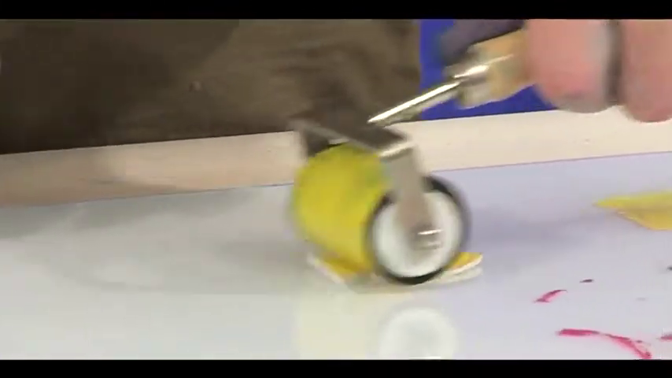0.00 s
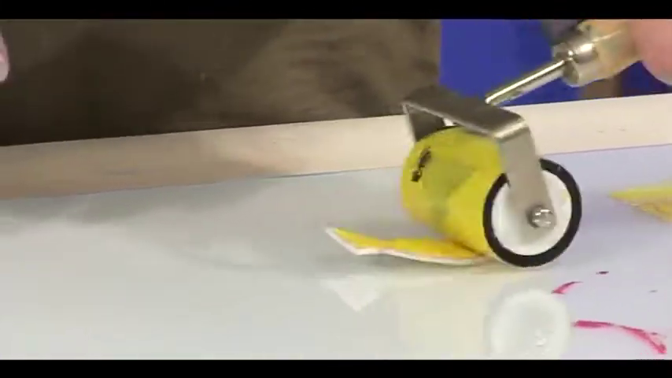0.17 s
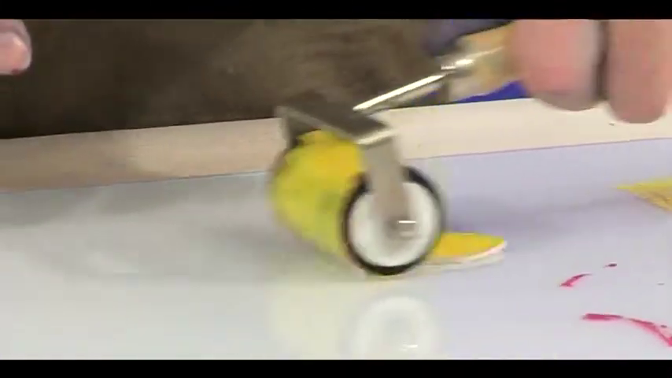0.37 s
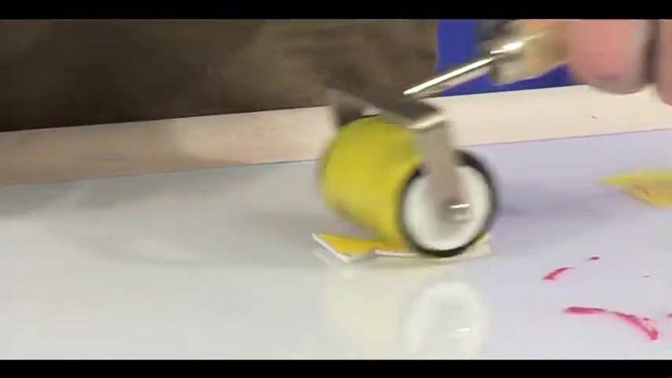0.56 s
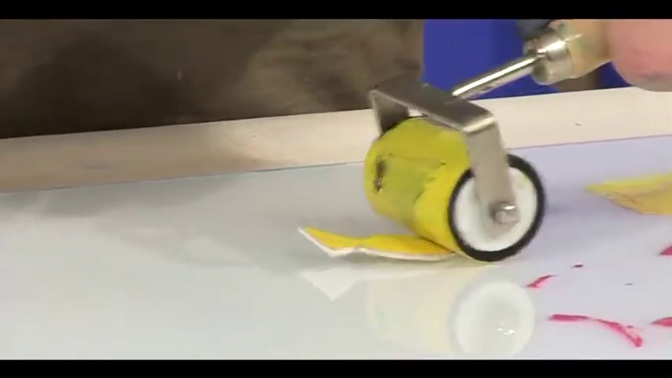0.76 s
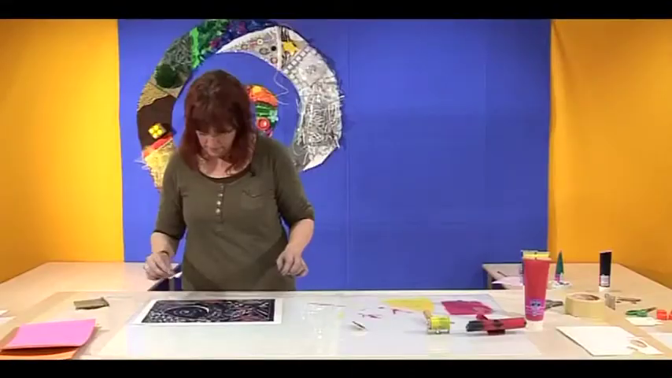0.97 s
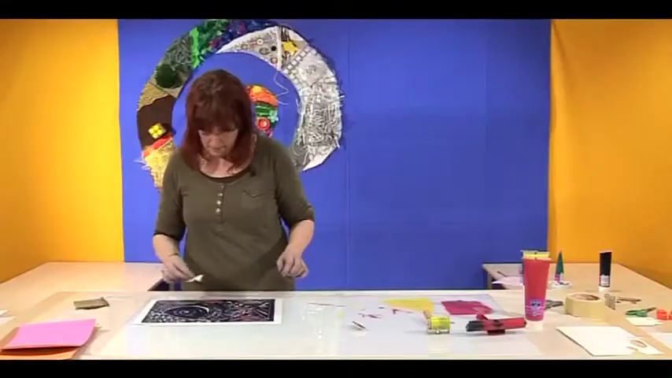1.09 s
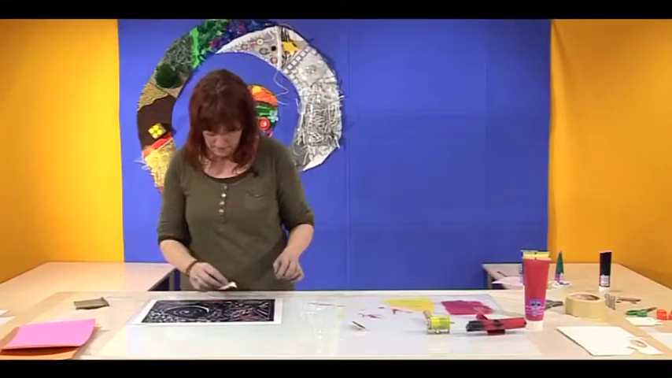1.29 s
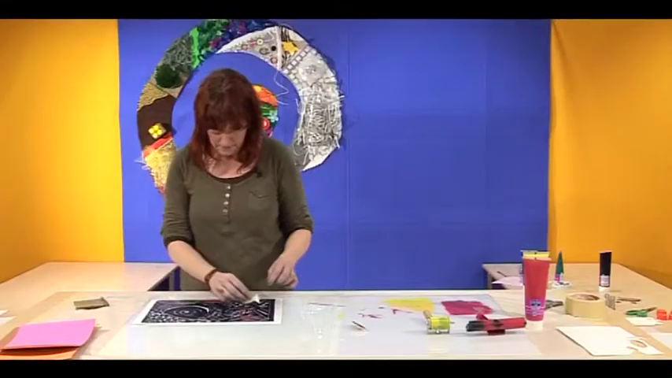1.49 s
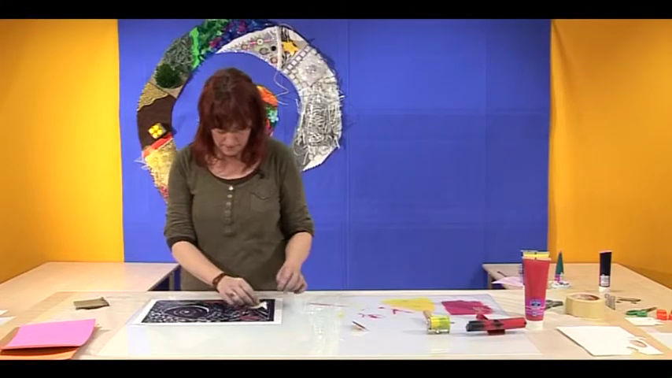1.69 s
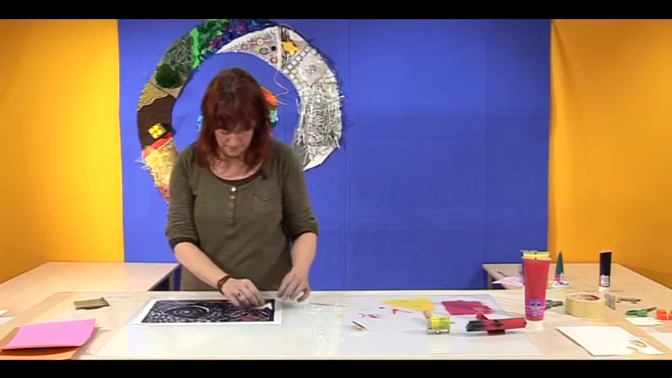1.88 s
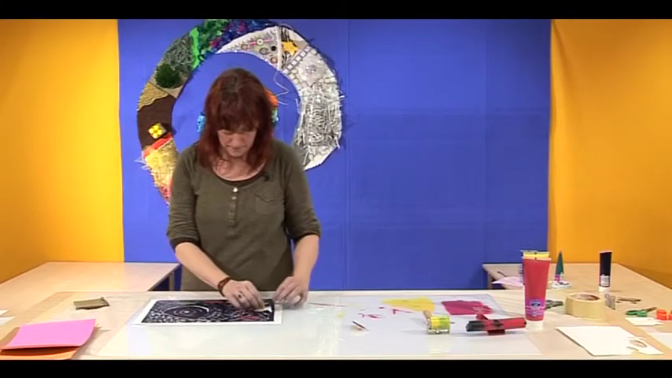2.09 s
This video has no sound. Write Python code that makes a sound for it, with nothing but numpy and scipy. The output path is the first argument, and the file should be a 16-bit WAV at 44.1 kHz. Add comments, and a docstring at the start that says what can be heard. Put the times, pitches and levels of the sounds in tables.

```python
"""A hard-walled studio: close by, a small rubber roller is pushed to and fro over a smooth sheet.
Its axle squeaks by stick-slip (stacks of harmonics), chatters (grainy noise) and rings the metal bracket.
The rubber hisses as it rolls (shaped noise), and the room holds the squeaks (decaying noise echo).
An edit cuts off roller and echo; after a brief, much quieter gap, a second shot has only the quiet room
and small handling rustles."""
import sys
import numpy as np
from scipy import signal
from scipy.fft import rfft, irfft
from scipy.io import wavfile
from scipy.ndimage import uniform_filter1d

SR = 44100
rng = np.random.default_rng(int(sys.argv[2]) if len(sys.argv) > 2 else 0)


def makeup_ratio(level_db):
    """Linear amplitude ratio for a level in decibels (20 dB per factor of ten)."""
    decades = np.asarray(level_db, float) / 20
    return 10 ** decades


def transcribe(u):
    """Save the signal u as a 16-bit wav file named by the first command-line argument.

    u: samples, shape (n,) or (channels, n), limited to [-1, 1]; the rate is SR.
    q: integer samples, one column per channel.
    """
    v = np.clip(np.atleast_2d(u).T, -1, 1)
    q = np.round(v * 32767).astype(np.int16)
    wavfile.write(sys.argv[1], SR, q)


N = 92610  # length in samples, 2.1 s
LEAD = SR // 2  # samples worked out before the start, so that earlier echoes are heard
CUT_S, GAP_S, GAP_DB = .9655, .004, -24  # when the edit cuts to the second shot; length and depth of the gap

# Squeaks of the axle, one list for each squeak. Each row: time in seconds, slip rate in Hz,
# level in dB before the harmonics are weighted, brightness in dB added to harmonic 2 (more to higher ones).
SQUEAK_PATHS = [
    [(0.2, 2190, -62, -20), (.208, 2204, -52, -37), (0.2118, 2158, -37, -14), (0.2127, 1918, -40.5, -1),
     (0.216, 1900, -37, -1.5), (0.226, 1821, -36.5, 0), (0.229, 1852, -39, -0.5), (0.235, 1834, -38.5, .5),
     (0.241, 1845, -37, 1), (.25, 1860, -35, -2), (.253, 1788, -48.5, 3), (.256, 1742, -45.5, -13),
     (.263, 1711, -45, -1), (0.27, 1980, -36, -3.5), (0.273, 1996, -51, -2), (0.28, 1944, -38.5, -24),
     (.285, 1950, -63, -10)],
    [(.07, 1948, -72, -12), (.11, 2050, -69, -7), (.15, 2060, -72, -21), (.17, 2110, -66, -18),
     (.197, 2200, -68, -18)],
    [(.694, 1920, -76, -2), (.699, 1933, -64, -14), (.702, 1943, -48.5, -19), (.709, 1900, -47, -8.5),
     (.713, 1800, -62, -14)],
    [(.722, 1980, -69, -23), (.735, 2070, -59, -23), (.75, 2140, -59, -30), (.757, 2080, -80, -20)],
    [(.76, 2124, -77, -9), (.768, 2057, -53, -35), (.77, 1850, -47, -3), (.7755, 1879, -38.5, -1.37),
     (.781, 1904, -39, -0.85), (.7858, 1845, -41, -1.5), (.7878, 1770, -50, -2), (.792, 1750, -62, -2)],
    [(.806, 1790, -74, -18), (.811, 1814, -48.5, -4), (.819, 1942, -37.5, -5), (.826, 1906, -45.5, -2),
     (.831, 1990, -39.5, -7.5), (.84, 2005, -45, -1), (.847, 1940, -58, -0.5), (.853, 1965, -69, -10),
     (.87, 1980, -64, -2), (.92, 1990, -72, -15), (.94, 1985, -67.5, -26), (.97, 1975, -69, -6)],
]
# A squeak that ends before the start, so only its echo is heard.
EARLIER_START_S, EARLIER_LENGTH_S, EARLIER_HZ, EARLIER_DB = -.15, .05, 1965, -46
# Overtones of the slipping. Each row: multiple of the slip rate, weight in dB before brightness and flutter.
HARMONIC_WEIGHTS = [(1, -1.5), (2, -1.5), (3, -8.5), (4, -14.5), (5, -26), (6, -21.5), (7, -28), (8, -24.5)]
JITTER = .008  # steady scatter of the slip rate, as a share of it
FLUTTER_DB = 2.4  # wavering of each harmonic above the first
# Moments when the slipping breaks up. Each row: start in seconds, length in seconds,
# peak level of the chatter in dB, extra scatter as a share of the slip rate.
CHATTER_MOMENTS = [(0.064, 0.11, -80, 0.031), (0.217, 0.035, -53.5, 0.0027), (0.245, 0.02, -44.5, 0.014),
                   (0.689, 0.035, -76, 0.023), (0.71, 0.057, -74, 0.015), (.768, 0.04, -74, 0.014),
                   (0.804, 0.033, -66, 0.003)]
# Tone of the chatter. Each row: centre in Hz, width of each of two filter passes in Hz, relative level in dB.
CHATTER_TONES = [(2450, 270, -1), (3390, 250, 7.5), (5000, 1500, 9), (6940, 1100, 8)]
# Ring of the metal bracket. Each row: pitch in Hz, width in Hz, gain in dB.
BRACKET_RINGS = [(13090, 14, 18)]

# Loudness of the rolling hiss. Each row: time in seconds, level in dB before it wavers.
ROLL_LEVEL = [(0, -68), (.04, -70.5), (.07, -90), (.11, -69), (.19, -69.5), (.3, -72), (.45, -70),
              (.5, -71), (.58, -88), (.63, -69.5), (.66, -62.5), (0.731, -69), (0.761, -67), (.9, -87),
              (0.972, -70)]
# Colour of the rolling hiss. Each row: frequency in Hz, relative strength in dB per Hz.
ROLL_SPECTRUM = [(900, -40), (1500, -7.5), (2100, 3), (2350, -3), (2600, 1.5), (3000, -4), (4500, -5),
                 (7000, -10.5), (11000, -12), (15800, -13.5)]
GRAIN_DB, GRAINS_PER_S = 1.5, 1500  # average jump of a grain, and how many grains a second

# Echo tail of the room. Each row: band centre in Hz, time to fall 60 dB in seconds, relative gain in dB.
ROOM_DECAY = [(980, 0.4, 8.5), (1900, 1.25, -1.5), (3760, 0.92, -2.5), (6050, 0.8, 0), (8100, 0.9, -4),
              (13600, 1.16, -1.5)]
TAIL_DB, EARLY_DB, EARLY_S = -16, -14, 0.017  # gains of tail and early echo; decay time of the early echo

# Dull rubs of the hand on the table. Each row: start in seconds, length in seconds,
# peak level in dB, centre in Hz.
HAND_RUBS = [(0, 0.042, -62, 422), (0.143, 0.054, -71, 463), (0.351, 0.17, -61.5, 468),
             (0.953, 0.0089, -59, 590), (1.983, 0.096, -68, 388)]
# Rustles of paper and cloth. Each row: start in seconds, decay time in seconds,
# level in dB before the fade, centre in Hz.
PAPER_RUSTLES = [(.995, 0.019, -67.5, 3450), (1.012, 0.012, -67.5, 9000), (1.46, 0.065, -68, 4500),
                 (1.48, 0.22, -75, 2290), (1.926, 0.02, -75, 3500), (1.98, .03, -67, 1700),
                 (2.008, 0.056, -68, 1480), (2.005, 0.026, -77, 5000)]

# Colour of the quiet room noise. Each row: frequency in Hz, relative strength in dB per Hz.
ROOM_SPECTRUM = [(41, -35.5), (70, -5), (82, -1.5), (129, -3.5), (151, -11), (181, -8), (291, -8.5),
                 (408, -13.5), (1080, -18.5), (2850, -32.5), (15600, -36)]
ROOM_NOISE_DB = -63
HUM_HZ, HUM_DB = 51.4, -67.5  # average pitch and level of the wavering hum
# Low drones of the first shot, heard only until the edit cut.
# Each row: centre in Hz, width of each of two filter passes in Hz, level in dB.
FIRST_SHOT_DRONES = [(112.4, 46, -70), (177, 27, -66.5)]
# Swells of a faint tone. Each row: start in seconds, length in seconds, peak level in dB.
TONE_SWELLS = [(1.06, 0.11, -66), (1.77, 0.08, -67.5), (1.97, 0.14, -64.5)]


def squeak(t, rows):
    """Stick-slip at the axle: a stack of harmonics whose rate scatters more while it chatters."""
    r = np.array(rows, float)
    hz, db, bright = (np.interp(t, r[:, 0], r[:, k]) for k in range(1, 4))
    gate = np.clip(np.minimum(t - r[0, 0], r[-1, 0] - t) / 0.0023, 0, 1)  # 2.3 ms fades

    scatter = JITTER + sum(share * swell(t, s, length) for s, length, _, share in CHATTER_MOMENTS)
    slip_rate = hz * (1 + scatter * walk(len(t), 1200))
    phase = 2 * np.pi * np.cumsum(slip_rate) / SR

    tone = np.zeros(len(t))
    for k, weight_db in HARMONIC_WEIGHTS:
        flutter = FLUTTER_DB * (k > 1) * walk(len(t), 150)
        loudness = makeup_ratio(weight_db + bright * (k - 1) ** 1.29 + flutter)
        tone += loudness * np.cos(k * phase + 0.797 * k * k)  # staggered starting phases
    return gate * makeup_ratio(db) * np.sqrt(2) * tone


def chatter(t):
    """Broken-up slipping: grainy noise in a few bands, swelling at each chatter moment."""
    grains = grainy(len(t))
    bands = sum(makeup_ratio(db) * level(band_twice(grains, hz, w), 0) for hz, w, db in CHATTER_TONES)
    loudness = sum(makeup_ratio(db) * swell(t, s, length) for s, length, db, _ in CHATTER_MOMENTS)
    return level(bands, 0) * loudness


def bracket(slips):
    """The slipping shakes the metal bracket, which answers at its own pitch."""
    return sum(makeup_ratio(db) * band(slips, hz, w) for hz, w, db in BRACKET_RINGS)


def axle(t):
    """All squeaks and chatter of the slipping axle, with the bracket ringing along."""
    earlier = [(EARLIER_START_S, EARLIER_HZ, EARLIER_DB, -9),
               (EARLIER_START_S + EARLIER_LENGTH_S, 1.02 * EARLIER_HZ, EARLIER_DB, -9)]
    slips = sum(squeak(t, rows) for rows in [earlier, *SQUEAK_PATHS])
    slips = slips + chatter(t)
    return slips + bracket(slips)


def rolling(t):
    """Tacky rubber peels off the sheet as a fine, wavering hiss."""
    times, db = np.array(ROLL_LEVEL).T
    loudness = makeup_ratio(np.interp(t, times, db) + 3.1 * walk(N, 30))
    return coloured(grainy(N), ROLL_SPECTRUM) * loudness


def studio(x):
    """Hard walls return dense early echoes and a tail whose bands each die at their own pace."""
    t = np.arange(SR) / SR
    tail = np.zeros(SR)
    for hz, t60, db in ROOM_DECAY:
        fade = np.exp(-np.log(1000) * t / t60)
        tail += makeup_ratio(db) * band_twice(rng.standard_normal(SR), hz, hz / 2) * fade
    early = rng.standard_normal(SR) * np.exp(-t / EARLY_S)

    onset = np.clip((t - .003) / 0.0014, 0, 1)  # the first echo arrives after 3 ms
    tail = onset * tail / np.sqrt(np.sum(tail ** 2))
    early = onset * early / np.sqrt(np.sum(early ** 2))
    return signal.fftconvolve(x, makeup_ratio(TAIL_DB) * tail + makeup_ratio(EARLY_DB) * early)[:len(x)]


def rubs(t):
    """The hand rubs the table: dull bands of grainy noise that swell and fade."""
    out = np.zeros(N)
    for s, length, db, hz in HAND_RUBS:
        out += swell(t, s, length) * level(band_twice(grainy(N), hz, 0.58 * hz), db)
    return out


def rustles(t):
    """Paper and cloth: bands of grainy noise that start quickly and die away."""
    out = np.zeros(N)
    for s, decay, db, hz in PAPER_RUSTLES:
        shape = np.clip((t - s) / 0.0029, 0, 1) * np.exp(-np.clip(t - s, 0, None) / decay)
        out += shape * level(band(band(grainy(N), hz, 0.96 * hz), hz, 1.3 * hz), db)
    return out


def hum(t):
    """A low sine hum whose pitch and loudness wander."""
    loudness = makeup_ratio(2.0 * walk(N, 17))
    pitch = HUM_HZ * (1 + 0.0588 * walk(N, 7.7))
    return level(loudness * np.sin(2 * np.pi * np.cumsum(pitch) / SR), HUM_DB)


def drone(hz, width, db):
    """A faint drone of the building: noise narrowed to a band."""
    return level(band_twice(rng.standard_normal(N), hz, width), db)


def background(t):
    """Air noise and microphone hiss as one shaped noise, with rumble, hum and faint drones."""
    air = level(coloured(rng.standard_normal(N), ROOM_SPECTRUM), ROOM_NOISE_DB)
    rumble = drone(42.3, 43, -66.5)
    first_shot = sum(drone(*row) for row in FIRST_SHOT_DRONES) * (t < CUT_S)
    tone = drone(295.5, 15, 0) * sum(makeup_ratio(db) * swell(t, s, length) for s, length, db in TONE_SWELLS)
    return air + rumble + hum(t) + first_shot + tone


def level(x, db):
    """Scale to an rms (average) level in dB."""
    return x * makeup_ratio(db) / np.sqrt(np.mean(x ** 2) + 1e-30)


def band(x, hz, width):
    """Resonance with gain 1 at the centre."""
    return signal.lfilter(*signal.iirpeak(min(hz, .45 * SR), hz / width, SR), x)


def band_twice(x, hz, width):
    """The same resonance passed twice, for steeper sides."""
    return band(band(x, hz, width), hz, width)


def coloured(x, points):
    """Shape a noise by points of frequency and dB, then scale it to rms 1."""
    hz, db = np.array(points).T
    f = np.arange(len(x) // 2 + 1) * SR / len(x) + 1  # 1 Hz added to avoid log(0)
    gain_db = np.interp(np.log(f), np.log(hz), db, left=-80, right=-80)
    return level(irfft(rfft(x) * makeup_ratio(gain_db), len(x)), 0)


def walk(size, rate):
    """Smooth random wander with rms 1; a higher rate wanders faster."""
    k = max(int(SR / rate), 1)
    return level(uniform_filter1d(uniform_filter1d(rng.standard_normal(size), k), k), 0)


def grainy(size):
    """Noise whose loudness jumps from grain to grain."""
    k = int(SR / GRAINS_PER_S)
    jumps_db = GRAIN_DB * rng.exponential(size=size // k + 1)
    loudness = np.repeat(makeup_ratio(jumps_db), k)[:size]
    return level(loudness * rng.standard_normal(size), 0)


def swell(t, s, length):
    """Rise and fall once, as half a sine, from time s."""
    return np.sin(np.pi * np.clip((t - s) / length, 0, 1))


def scene():
    """The roller and its echo sound until the edit cut; room and handling are heard on both sides."""
    t = np.arange(N) / SR
    near = axle(np.arange(-LEAD, N) / SR)
    roller = (near + studio(near))[LEAD:] + rolling(t)
    mix = roller * (t < CUT_S) + rubs(t) + rustles(t) + background(t)
    gap = np.where((t > CUT_S) & (t < CUT_S + GAP_S), makeup_ratio(GAP_DB), 1)
    return (mix * gap)[None]  # one channel


def roll_off(x):
    """The treble ends steeply here."""
    return signal.sosfilt(signal.butter(12, 15700, fs=SR, output="sos"), x)


def record(dry):
    """Pass on the finished mix with no other colour."""
    return roll_off(dry)


dry = scene()
out = record(dry)
transcribe(out)
```